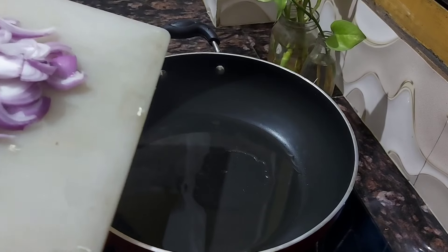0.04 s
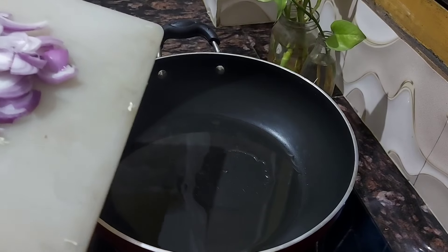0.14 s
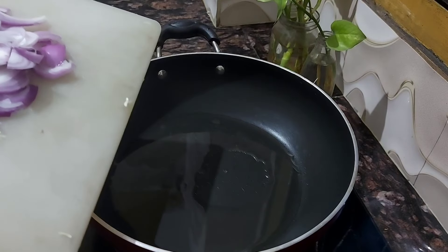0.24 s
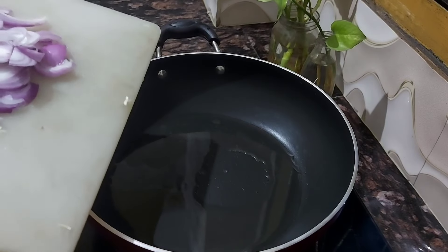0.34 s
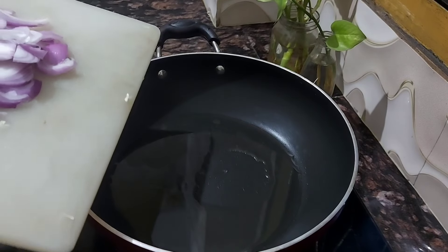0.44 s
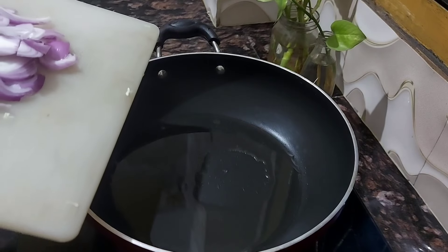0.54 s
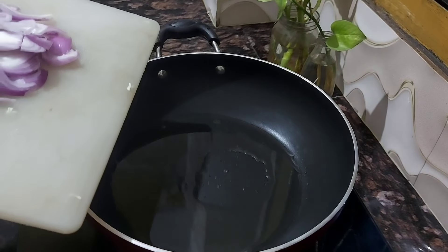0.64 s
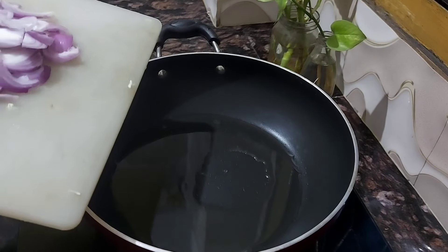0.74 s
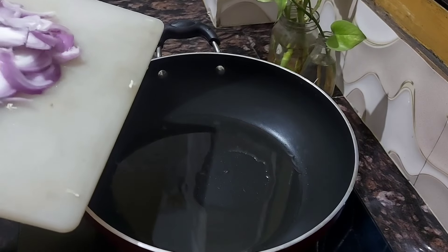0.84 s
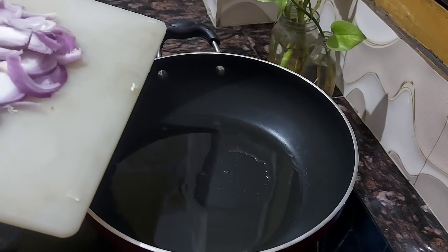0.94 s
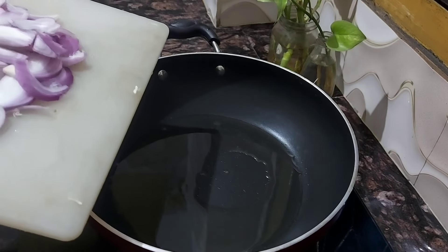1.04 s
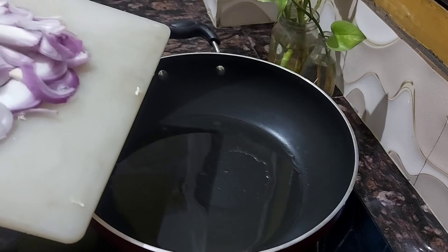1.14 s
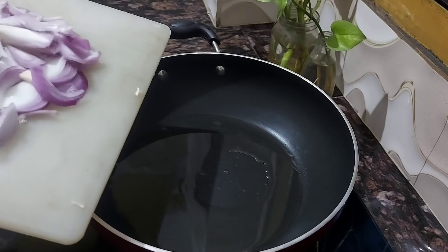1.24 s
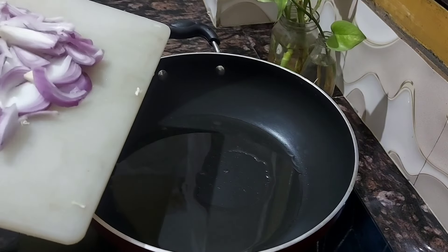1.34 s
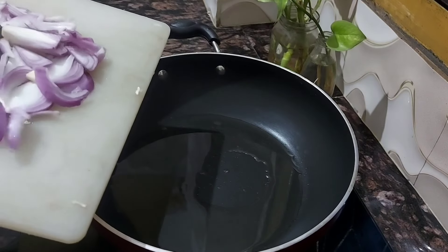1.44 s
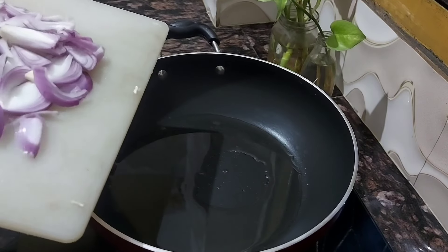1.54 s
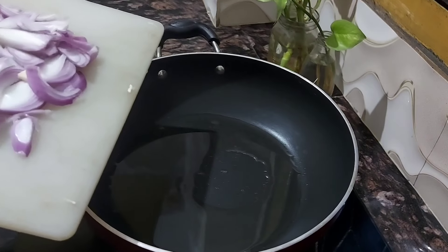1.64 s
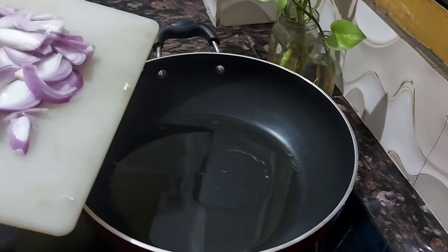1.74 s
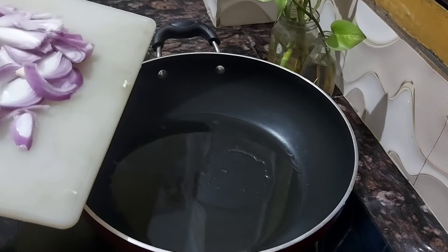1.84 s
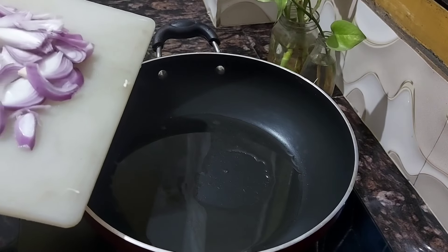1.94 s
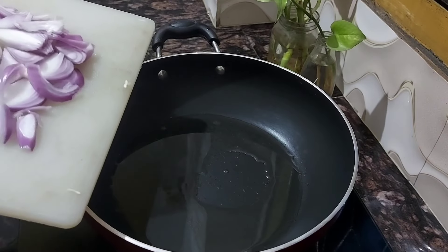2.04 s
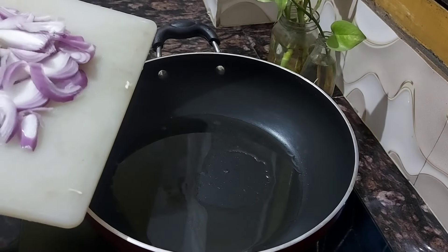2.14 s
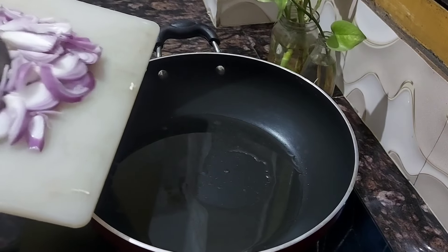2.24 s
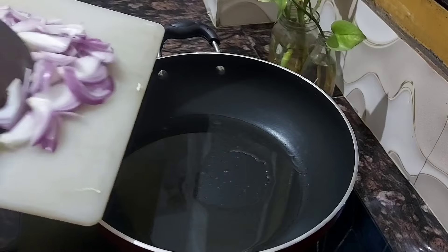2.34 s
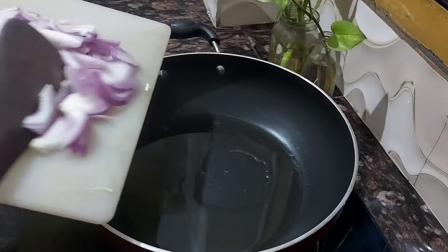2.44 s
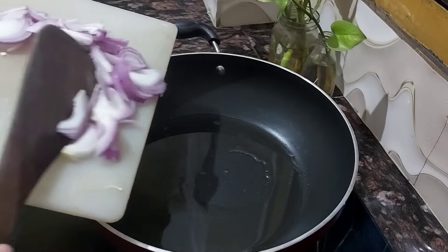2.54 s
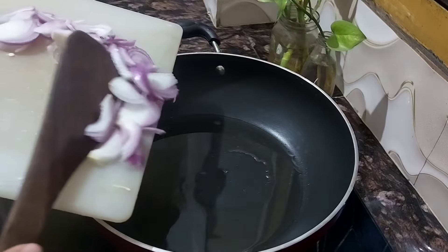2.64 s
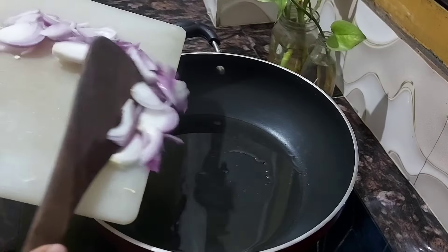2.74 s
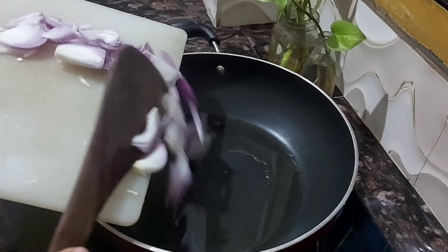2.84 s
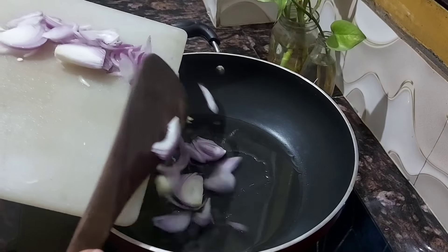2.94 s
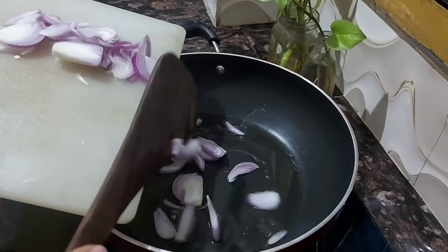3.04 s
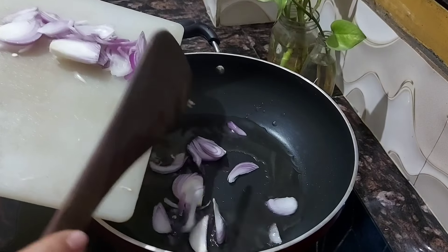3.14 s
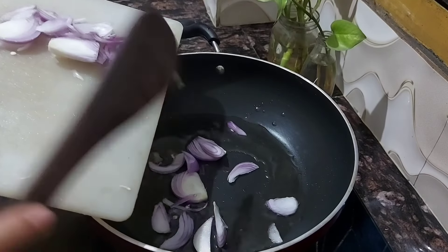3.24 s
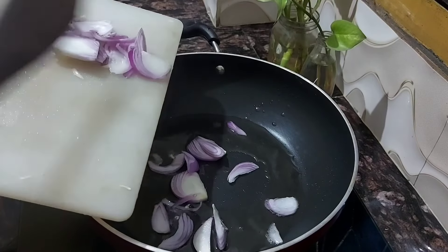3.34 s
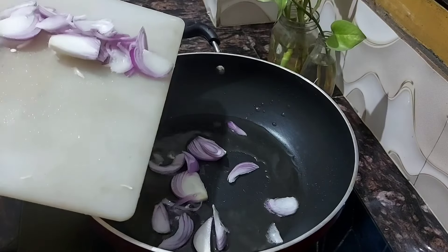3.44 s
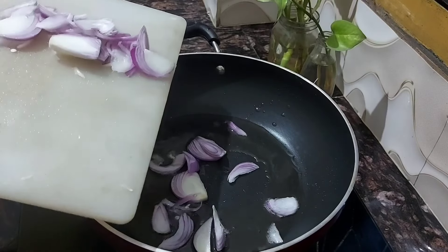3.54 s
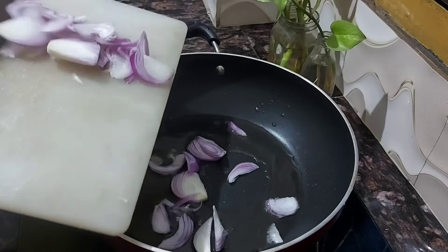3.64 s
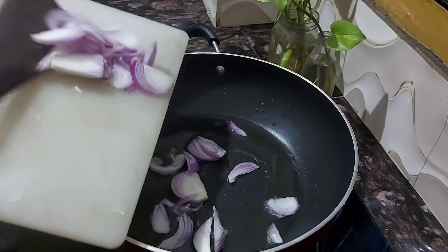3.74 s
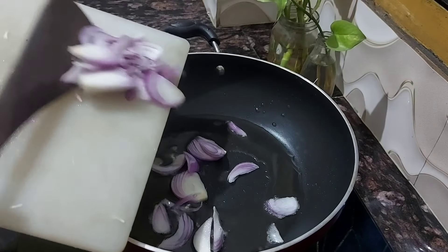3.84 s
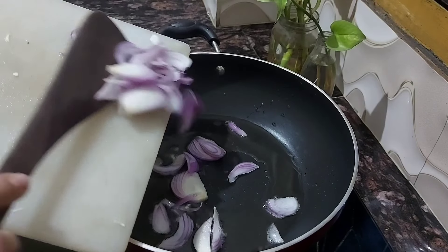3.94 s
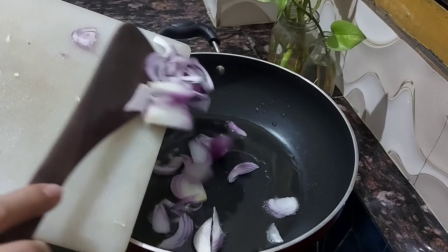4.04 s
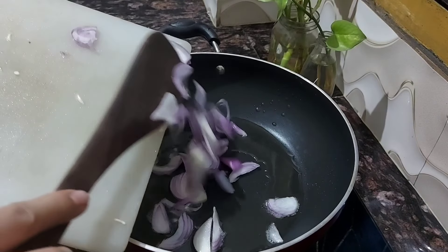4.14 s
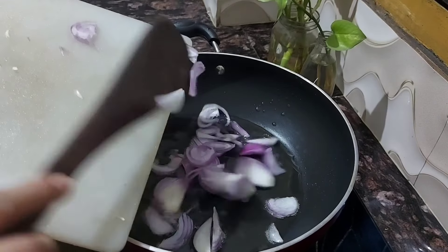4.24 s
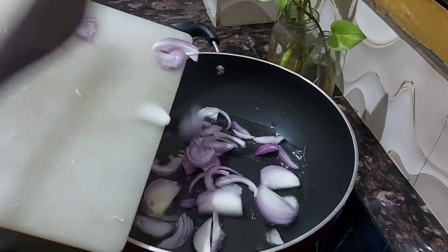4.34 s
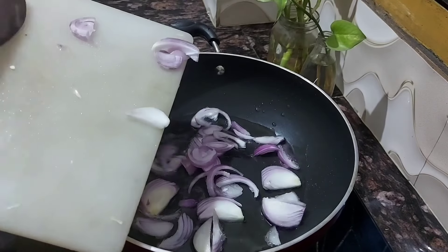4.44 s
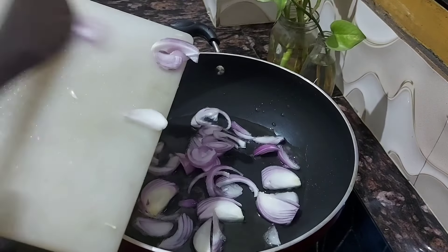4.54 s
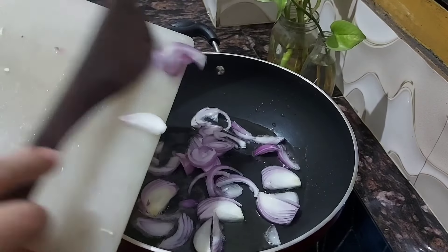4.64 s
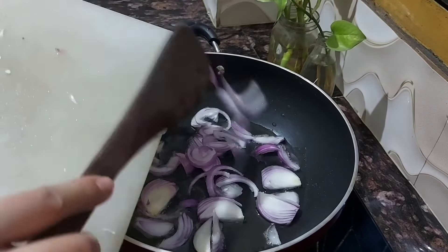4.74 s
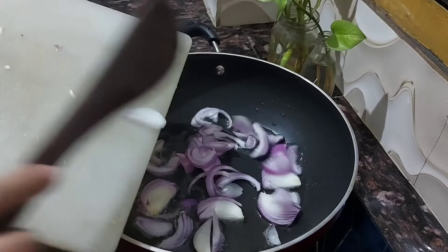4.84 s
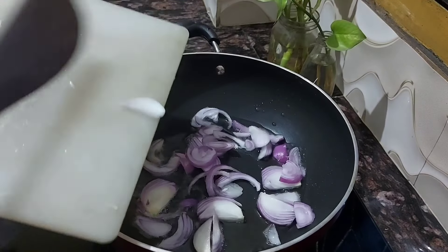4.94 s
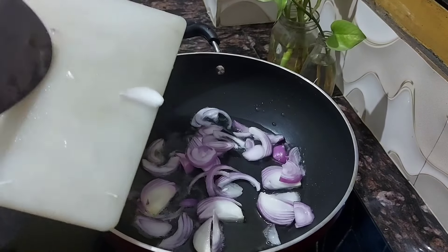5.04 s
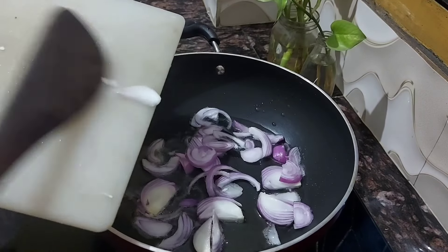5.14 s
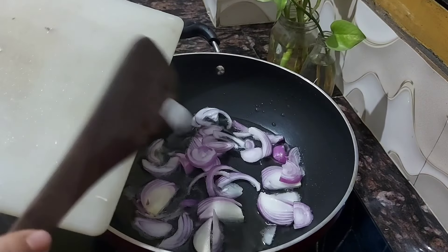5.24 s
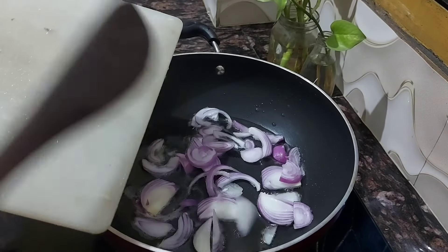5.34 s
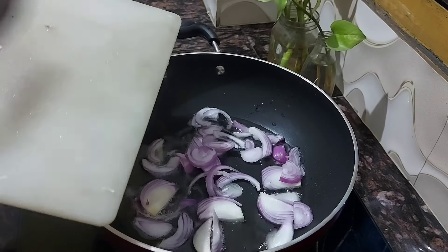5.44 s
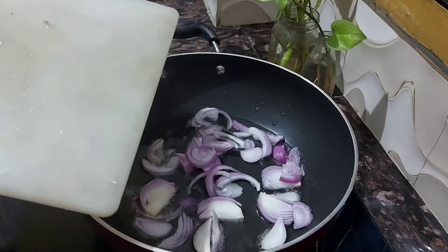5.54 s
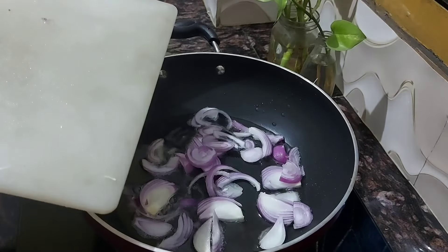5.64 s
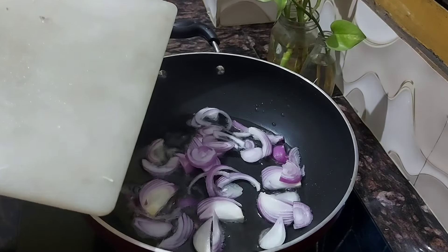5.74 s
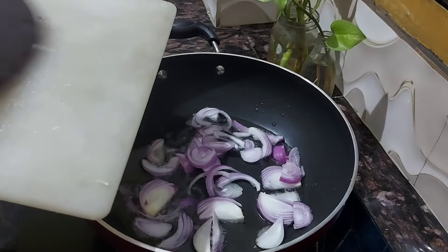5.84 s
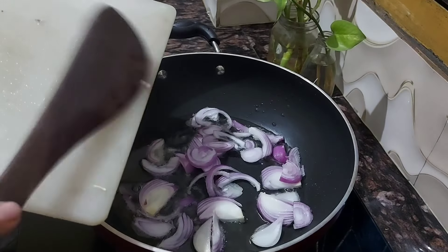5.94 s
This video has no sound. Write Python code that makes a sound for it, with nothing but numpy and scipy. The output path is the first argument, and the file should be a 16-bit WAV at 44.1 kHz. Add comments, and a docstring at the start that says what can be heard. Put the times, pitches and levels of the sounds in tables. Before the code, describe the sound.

A gas burner snaps and lights, then onion slices drop into hot oil, sizzling and popping as a spatula scrapes a board.

```python
"""A tiled kitchen, with soft room noise and mains hum; an inaudible microphone offset swells and settles.
A gas igniter snaps, gas hisses faintly; at 2 s the flame catches with a puff and rumbles on.
From 3 s onion slices thud into a pan of oil and ring its modes; wind or handling bumps the microphone.
Water boils off in a dense sizzle, with sharp pops of bursting drops and one bright metallic clink.
From 3.8 s a wooden spatula knocks on a plastic board and scrapes more slices in."""
import sys
import numpy as np
from scipy import signal
from scipy.fft import rfft, irfft, next_fast_len
from scipy.io import wavfile

SR = 44100
rng = np.random.default_rng(int(sys.argv[2]) if len(sys.argv) > 2 else 0)


def int16_out(signal):
    """Quantize to a 16-bit WAV file."""
    q = np.round(np.clip(np.atleast_2d(signal).T, -1, 1) * 32767)
    wavfile.write(sys.argv[1], SR, q.astype(np.int16))


N = 264159
T = np.arange(N) / SR
OIL_S = 3.066  # first slices reach the oil


def from_db(db):
    """Decibels to gain."""
    return 10 ** (np.asarray(db) / 20)


def rms_one(x):
    """Scale to unit power."""
    return x / np.sqrt(np.mean(x ** 2) + 1e-20)


def at_hz(points, hz):
    """Interpolate a table over log frequency."""
    f, value = np.transpose(points)
    return np.interp(np.log(hz + 1e-3), np.log(f), value)


def filtered(x, response):
    """Apply the gain response(hz)."""
    size = next_fast_len(x.shape[-1] + SR // 10)
    gain = response(np.fft.rfftfreq(size, 1 / SR))
    return irfft(rfft(x, size) * gain, size)[..., :x.shape[-1]]


def coloured(x, colour):
    """Shape x by a spectrum table, rolled off beyond its ends; rms 1."""
    def response(hz):
        low_cut = 1 + (.7 * colour[0][0] / (hz + 1)) ** 6
        high_cut = 1 + (.7 * hz / colour[-1][0]) ** 6
        return from_db(at_hz(colour, hz)) / np.sqrt(low_cut * high_cut)
    return rms_one(filtered(x, response))


def spread(pair):
    """Two independent signals to partly correlated left and right."""
    # diffuse field: f/Hz, left-right correlation
    likeness = [(50, 0.29), (150, 0.65), (1000, 0.62), (2500, 0.44), (9000, 0.5)]
    side = filtered(pair[1], lambda hz: np.sqrt(2 / (1 + np.clip(at_hz(likeness, hz), 0, 1)) - 1))
    return np.array([pair[0] + side, pair[0] - side])


def placed(x, balance):
    """Left-right balance per frequency."""
    return filtered(x, lambda hz: from_db(at_hz(balance, hz) * np.array([[.5], [-.5]])))


def noise(colour):
    """Diffuse stereo noise."""
    return spread(coloured(rng.standard_normal((2, N)), colour))


def drift(rate_hz):
    """Piecewise linear random curve; rms 1."""
    knots = np.arange(0, T[-1] + 1, 1 / rate_hz)
    return rms_one(np.interp(T, knots, rng.standard_normal(len(knots))))


def grains(per_s, size_db):
    """Two random click trains, a few clicks larger than the rest."""
    sizes = from_db(size_db * np.minimum(rng.exponential(1, (2, N)), 5))
    return (rng.random((2, N)) < per_s / SR) * sizes * rng.choice([-1, 1], (2, N))


def resonance(x, hz, width_hz):
    """Two-pole band-pass, peak gain 1."""
    r = np.exp(-np.pi * width_hz / SR)
    feedback = [1, -2 * r * np.cos(2 * np.pi * hz / SR), r * r]
    return signal.lfilter(np.array([1, 0, -1]) * (1 - r * r) / 2, feedback, x + 1e-18)


def envelope(start_s, attack_s, hold_s, release_s):
    """Smooth rise to 1, hold, exponential decay."""
    rise = np.sin(np.pi / 2 * np.clip((T - start_s) / attack_s, 0, 1)) ** 2
    return rise * np.exp(-np.clip((T - start_s - attack_s - hold_s) / release_s, 0, 40))


def onset(start_s, attack_s):
    """Smooth rise to 1, held."""
    return envelope(start_s, attack_s, T[-1], 1)


def swell(peak_s):
    """Burst envelope: 1 at peak_s, then a quick fall."""
    age = T[:SR // 8] / peak_s
    return age * np.exp(1 - age)


def crack(peak_s, low_hz, high_hz, grit):
    """Band-limited click with a gritty trail; peak 1."""
    shape = swell(peak_s)
    force = grit * shape * np.clip(rng.standard_normal(len(shape)), -1, 1)
    force[np.argmax(shape)] += 2
    force = signal.sosfilt(signal.butter(2, low_hz, "high", fs=SR, output="sos"), force)
    burst = signal.sosfilt(signal.butter(5, high_hz, fs=SR, output="sos"), force)
    return burst / np.abs(burst).max()


def add(track, start_s, sound):
    """Mix in a short sound."""
    i = max(round(start_s * SR), 0)
    track[..., i:i + sound.shape[-1]] += sound[..., :max(N - i, 0)]


def with_room(sound, tail_db, near_db=-12.0, build_s=0.0061, near_s=0.0015):
    """Direct sound, near scatter off pan and counter, and a room tail decaying per band."""
    # tiled room: f/Hz, t60/s
    room_t60 = [(150, 1), (1000, 0.73), (3000, 0.52), (8000, 0.62)]
    t = T[:SR * 3 // 4]
    edges_hz = np.geomspace(100, 12800, 8)
    white = spread(rng.standard_normal((2, len(t))))
    tail = 0
    for low, high in zip(edges_hz, edges_hz[1:]):
        band = signal.sosfilt(signal.butter(2, [low, high], "band", fs=SR, output="sos"), white)
        tail = tail + band * from_db(-60 * t / at_hz(room_t60, np.sqrt(low * high)))
    tail = rms_one(tail * (1 - np.exp(-t / build_s)))
    near = rms_one(rng.standard_normal(len(t)) * np.exp(-t / near_s)) * [[1], [-1]]
    response = (from_db(tail_db) * tail + from_db(near_db) * near) / np.sqrt(len(t))
    response[:, 0] += 1
    return signal.fftconvolve(response, sound[None], axes=1)


def background(air_db=-63.5, waver_db=1.0, fade_in_s=0.086):
    """Room noise and wavering mains hum; both fade in and dip briefly once."""
    # room noise: f/Hz, relative density/dB
    air_colour = [(25, -14), (50, -18.5), (100, -24), (160, -23), (260, -26.5), (600, -28.5), (1500, -33.5),
                  (3000, -36.5), (5600, -39.5), (7000, -48.5), (8000, -68), (9500, -71)]
    # hum partials: f/Hz, rms level/dB
    partials = [(100, -73.5), (249, -76), (300, -76), (350, -82), (500, -76), (600, -82.5), (700, -78),
                (800, -87), (1000, -79.5), (1100, -82), (1250, -84), (2300, -84.5)]
    hum = 0
    for hz, db in partials:
        amplitude = np.sqrt(2) * from_db(db - waver_db * drift(14))
        hum = hum + amplitude * np.sin(2 * np.pi * (hz * T + rng.random()))
    dip = 1 - 0.69 * envelope(0.603, attack_s=0.026, hold_s=0, release_s=0.083)
    fade_in = 1 - 0.51 * np.exp(-T / fade_in_s)
    return (from_db(air_db) * noise(air_colour) + hum) * dip * fade_in


def microphone_offset(peak_s=0.21, width_s=0.23, settle_s=2.3):
    """Inaudible DC offset: swells at switch-on, settles slowly."""
    return 0.061 * np.exp(-((T - peak_s) / width_s) ** 2) + 0.006 * np.exp(-(T / settle_s) ** 2)


def igniter(snap_s=0.1226, snap_db=-26.5, echo_db=-41.5, fade_db_per_s=37, gas_db=-65.5):
    """A sharp snap, its echo and the faint hiss of unlit gas."""
    # echo and gas: f/Hz, relative density/dB
    colour = [(90, -2.5), (160, -12), (300, -5), (650, -3), (1000, -5.5), (1300, -8.5), (1900, -7.5),
              (3000, -17.5), (4600, -20), (7000, -37), (9000, -77)]
    echo = from_db(echo_db - fade_db_per_s * (T - snap_s))
    echo *= envelope(snap_s, attack_s=0.0043, hold_s=0.21, release_s=0.051)
    gas = from_db(gas_db) * envelope(snap_s, attack_s=0.003, hold_s=0.42, release_s=0.043)
    out = noise(colour) * np.hypot(echo, gas)
    snap = crack(0.0006, low_hz=1500, high_hz=4200, grit=0.54)
    add(out, snap_s, from_db(snap_db) * with_room(snap, tail_db=-3.0))
    return out


def flame_and_bump(catch_s=2.013, rise_s=0.14):
    """Gas catches with a puff and settles to a rumble; later a low wind or handling bump on the mic."""
    # puff: f/Hz, relative density/dB
    puff_colour = [(59, -18), (100, -1), (282, -7.5), (426, -4.5), (587, -8), (1920, -12.5), (5410, -25.5),
                   (9000, -53), (11700, -83), (19800, -120)]
    # flame rumble and bump: f/Hz, relative density/dB
    rumble_colour = [(20, 9.5), (50, 3.5), (80, -3.5), (130, -11), (250, -24)]
    puff = from_db(-53) * envelope(catch_s, attack_s=0.076, hold_s=0.067, release_s=0.063)
    steady = from_db(-61.5) * onset(catch_s, rise_s)
    settling = from_db(-58.5) * envelope(catch_s, rise_s, hold_s=0, release_s=0.47)
    mic_bump = from_db(-54) * envelope(3.17, attack_s=0.09, hold_s=0, release_s=0.06)
    return puff * noise(puff_colour) + (steady + settling + mic_bump) * noise(rumble_colour)


def sizzle(fizz_trim_db=1.0, flare_bubbling_db=-6, pan_db=3.0, flicker_db=1.0):
    """Steam bubbles in oil: fine fizz at once; coarse bubbles grow later and shake the pan."""
    # water boiling off: t/s, fizz before trim/dB, bubbling/dB
    boil = [(3.2, -47.5, -55), (3.25, -45, -43.5), (3.52, -46.5, -51), (3.83, -43.5, -40),
            (4.05, -45.5, -43.5), (4.29, -43, -45), (4.43, -41.5, -41), (4.69, -42.5, -41),
            (5.01, -43, -42.5), (5.27, -41, -42.5), (5.59, -43, -47.5), (5.84, -41.5, -48),
            (5.98, -41, -40.5)]
    # a wet face turns into the oil: t/s, level/dB
    flares = [(3.06, -44.5), (3.365, -36.5), (3.445, -40), (3.475, -52.5), (3.614, -42.5), (3.809, -46.5),
              (4.345, -43.5), (4.465, -44.5), (4.725, -43), (5.09, -42.5), (5.285, -42), (5.375, -41),
              (5.584, -43), (5.795, -39.5)]
    # fine bubbles: f/Hz, relative density/dB
    fizz_colour = [(1500, -5.5), (2800, -7), (3800, -0.5), (5000, 1.5), (6000, 0), (7000, -7), (8000, -18),
                   (9500, -32)]
    # coarse bubbles: f/Hz, relative density/dB
    bubbling_colour = [(40, -6), (150, -5.5), (230, -2.5), (320, 0.5), (450, -1), (700, -1), (1050, -4.5),
                       (1450, -4.5), (1900, -1), (2600, -1), (3600, -2.5), (6000, -49)]
    times_s, fine_db, coarse_db = np.transpose(boil)
    flare = sum(from_db(db) * envelope(start_s, attack_s=0.011, hold_s=0.019, release_s=0.037)
                for start_s, db in flares)
    fine = from_db(fizz_trim_db + np.interp(T, times_s, fine_db)) * onset(OIL_S, attack_s=0.004)
    coarse = from_db(np.interp(T, times_s, coarse_db)) * onset(OIL_S, attack_s=0.11)
    fizz = coloured(grains(per_s=14000, size_db=3.0), fizz_colour) * np.hypot(fine, flare)
    bubbling = coloured(grains(per_s=7000, size_db=1.5), bubbling_colour)
    bubbling *= np.hypot(coarse, from_db(flare_bubbling_db) * flare)
    pan = from_db(pan_db) * resonance(bubbling, hz=1440, width_hz=100)
    return spread(fizz + bubbling + pan) * from_db(flicker_db * drift(90))


def heaps():
    """Many soft slices thud into the pan together."""
    # heaps: t/s, level/dB, fall time/s
    falls = [(3.065, -47.5, .01), (4.27, -42.5, 0.038)]
    # thud: f/Hz, relative density/dB
    colour = [(50, -9), (110, -0.5), (170, -3.5), (260, -5), (600, -9)]
    level = sum(from_db(db) * envelope(start_s, fall_s, hold_s=0.056, release_s=0.072)
                for start_s, db, fall_s in falls)
    return noise(colour) * level


def landings(reach_octaves=0.54, phase_rad=0.59, slap_s=0.0015, sag_per_s=0.0236):
    """A slice excites the pan modes near its slap's pitch; oil damps most at once, the rest rings."""
    # slice impacts: t/s, ring/dB, slap peak/dB, most excited f/Hz
    impacts = [(3.0676, -32, -23.5, 1400), (3.078, -28, -36.5, 820), (3.1538, -32, -59, 940),
               (3.481, -40, -41.5, 1500), (3.625, -43.5, -31.5, 1520), (3.6708, -47, -22.5, 1570),
               (3.839, -42.5, -32.5, 1500), (4.31, -44, -38, 1510), (4.369, -45.5, -35, 1500),
               (4.939, -47, -37, 1400), (5.63, -43, -40.5, 1400)]
    # pan modes: f/Hz, relative level/dB, t60/s
    modes = [(845, 1, .36), (882, -13, .3), (1420, -10, .4), (1465, -1, .65), (1520, -10, .3),
             (2008, -16, .3), (2557, -9, .2)]
    out, t = np.zeros((2, N)), T[:SR]
    phases = phase_rad * np.array([[1], [-1]])  # the wide pan reaches the two sides out of step
    for start_s, ring_db, slap_db, centre_hz in impacts:
        load = 1 - sag_per_s * (start_s - OIL_S)  # pitch falls as the pan fills
        ring = 0
        for hz, mode_db, t60_s in modes:
            excitation = np.exp(-(np.log2(hz / centre_hz) / reach_octaves) ** 2)
            decay = from_db(mode_db - 60 * t / t60_s)
            ring = ring + excitation * decay * np.sin(2 * np.pi * hz * load * t + phases)
        slap = ring[0, :SR // 8] * swell(slap_s)
        build_s = 0.00085 * from_db(0.31 * (ring_db - slap_db))  # soft landing, slow build
        add(out, start_s, from_db(ring_db) * ring * (1 - np.exp(-t / build_s)))
        add(out, start_s, from_db(slap_db) * with_room(slap / np.abs(slap).max(), tail_db=3.0))
    return out


def pops_and_clink(swell_cycles=3.3):
    """Sharp pops of bursting drops and one bright metallic clink: each a brief tone and a drier click."""
    # pops, and the clink at 3.67 s: t/s, tone/dB, f/Hz, click/dB
    events = [(3.0681, -23.5, 5520, -29.5), (3.2629, -23, 3630, -27), (3.389, -24.5, 4600, -38),
              (3.4574, -32, 5030, -23), (3.579, -32.5, 3730, -18), (3.6703, -13.5, 2997, -15.5),
              (3.892, -33, 2420, -35), (5.0225, -34, 4000, -13.5), (5.3595, -27, 4160, -9),
              (5.633, -32, 3630, -27)]
    out = np.zeros((2, N))
    for start_s, tone_db, hz, click_db in events:
        tone = swell(swell_cycles / hz) * np.sin(2 * np.pi * hz * T[:SR // 8])
        click = crack(0.00078, low_hz=900, high_hz=6110, grit=0.15)
        add(out, start_s, from_db(tone_db) * with_room(tone, tail_db=2.0, near_db=-25.0))
        add(out, start_s, from_db(click_db) * with_room(click, tail_db=-10.0, near_db=-21.0))
    return out


def board(force):
    """The plastic board's resonances, summed with alternating sign."""
    # board modes: f/Hz, width/Hz, gain/dB
    modes = [(219.5, 35, -5.5), (318.5, 9.8, 7.5), (403.5, 19.4, 3), (485, 82, -2), (661, 92, 1),
             (812, 110, 4), (975, 160, -2), (1195, 39, 1), (1537, 230, -7.5), (1962, 107, -1),
             (3120, 800, -14), (5000, 1500, -24)]
    return sum((-1) ** k * from_db(db) * resonance(force, hz, width_hz)
               for k, (hz, width_hz, db) in enumerate(modes))


def spatula(contact_db=-9.5, judder_db=1.0, rasp_trim_db=-4.5):
    """Wood knocks on the board and drags onion over it in many small slips."""
    # knocks: t/s, peak/dB, brightness/Hz
    knocks = [(3.806, -34.5, 610), (4.588, -30.5, 1466), (4.664, -21, 2390), (5.1459, -15.5, 2120),
              (5.3604, -28, 1530), (5.792, -16, 2360), (5.9251, -13, 3120)]
    # strokes: t/s, push/s, release/s, scrape/dB, onion rasp before trim/dB
    strokes = [(3.795, 0.0076, 0.12, -42, -43), (4.629, 0.14, 0.099, -34.5, -31),
               (5.145, 0.021, .06, -35.5, -45), (5.24, 0.058, 0.12, -38.5, -37.5),
               (5.785, 0.012, 0.057, -34.5, -33.5), (5.85, 0.037, 0.059, -41, -43),
               (5.945, .022, .04, -43, -31.5)]
    # cut onion on plastic: f/Hz, relative density/dB
    rasp_colour = [(900, -3.5), (1250, 12.5), (1600, 9.5), (2100, 3), (3200, -2.5), (5000, -32)]
    out = np.zeros((2, N))
    for start_s, db, bright_hz in knocks:
        contact = crack(0.00076, low_hz=0.18 * bright_hz, high_hz=bright_hz, grit=0.21)
        knock = board(contact) + from_db(contact_db) * contact
        knock /= np.abs(knock).max()
        add(out, start_s, from_db(db) * with_room(knock, tail_db=0.0, near_db=-9.0))
    judder = from_db(-judder_db * drift(90))
    scrape = spread(rms_one(board(grains(per_s=3000, size_db=1.0) * judder)))
    rasp = spread(coloured(grains(per_s=1800, size_db=2.0) * judder, rasp_colour))
    for start_s, push_s, release_s, scrape_db, rasp_db in strokes:
        friction = from_db(scrape_db) * scrape + from_db(rasp_db + rasp_trim_db) * rasp
        out += friction * envelope(start_s, push_s, hold_s=0.011, release_s=release_s)
    return out


def scene():
    """Burner and hum to the left, pan ahead."""
    # stove: f/Hz, left minus right/dB
    stove_side = [(60, 6.5), (320, 8), (600, 4), (1700, 2.5), (3000, 0), (9000, -4)]
    # pan: f/Hz, left minus right/dB
    pan_side = [(60, -0.5), (300, 3.5), (1000, 2.5), (1800, 0.1), (3000, 0), (5500, -3), (9000, -3)]
    cooking = sizzle() + pops_and_clink() + landings() + spatula() + heaps()
    leftward = igniter() + flame_and_bump() + background() + microphone_offset()
    return placed(leftward, stove_side) + placed(cooking, pan_side)


def record(dry, cutoff_hz=9750):
    """Steep low-pass."""
    return signal.sosfilt(signal.ellip(10, .2, 70, cutoff_hz, fs=SR, output="sos"), dry)


dry = scene()
out = record(dry)
int16_out(out)
```